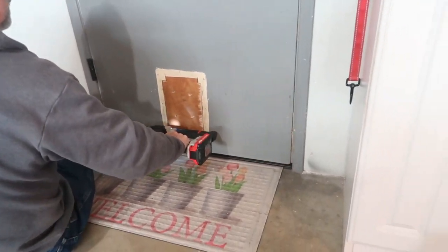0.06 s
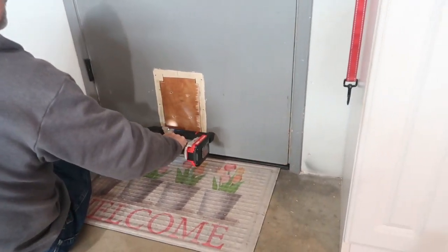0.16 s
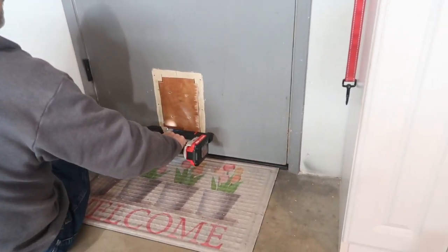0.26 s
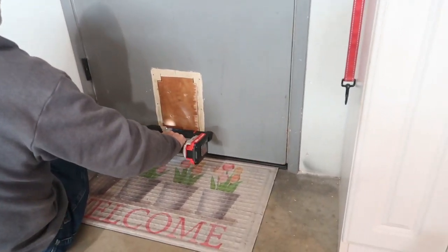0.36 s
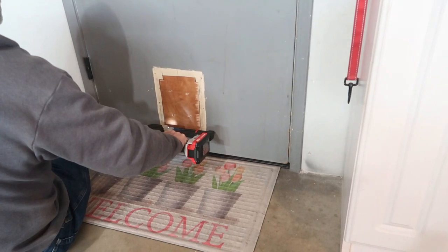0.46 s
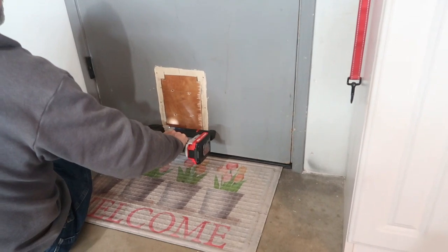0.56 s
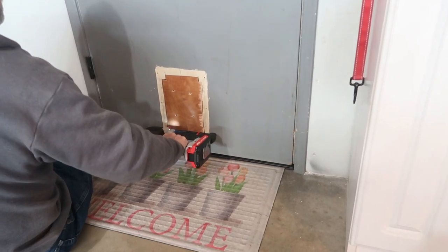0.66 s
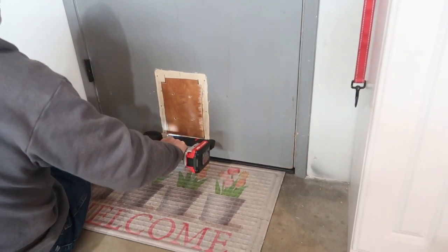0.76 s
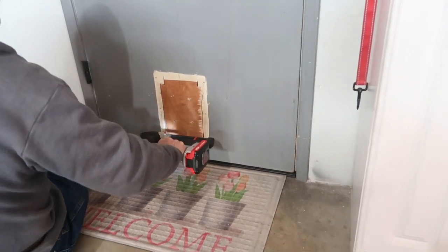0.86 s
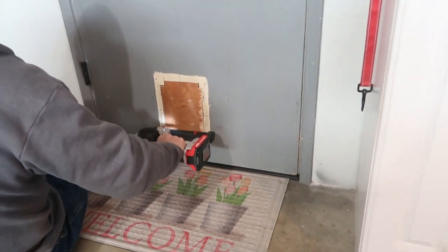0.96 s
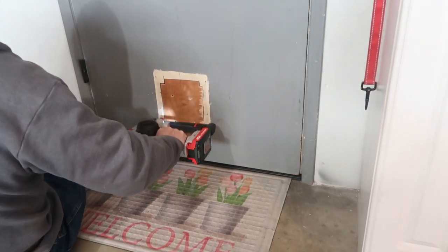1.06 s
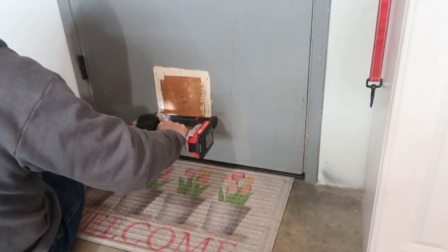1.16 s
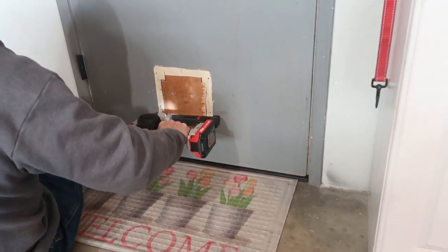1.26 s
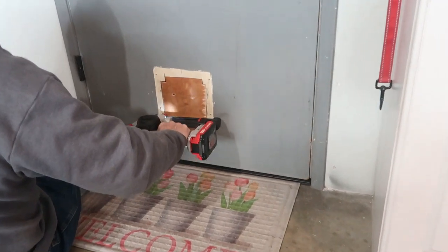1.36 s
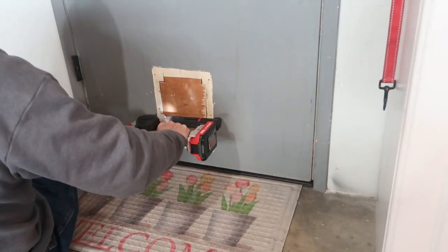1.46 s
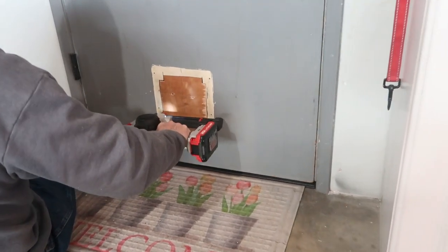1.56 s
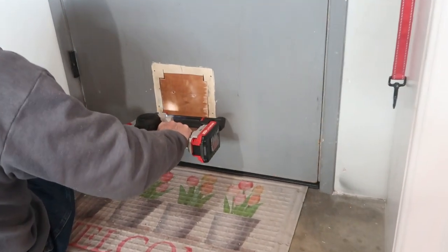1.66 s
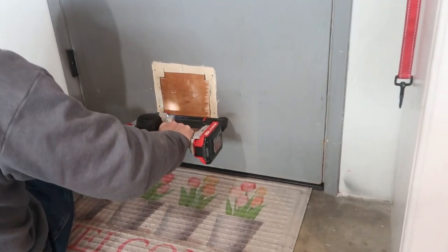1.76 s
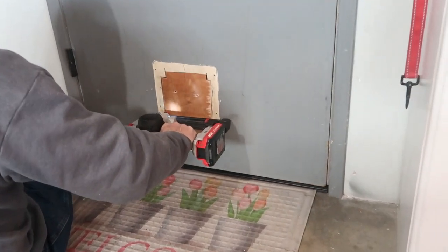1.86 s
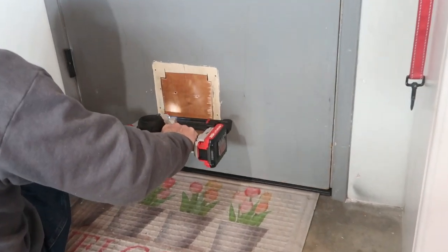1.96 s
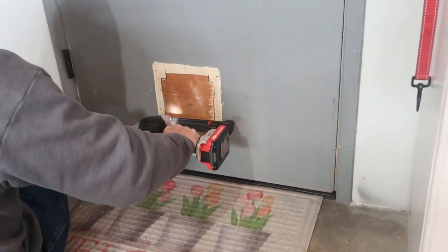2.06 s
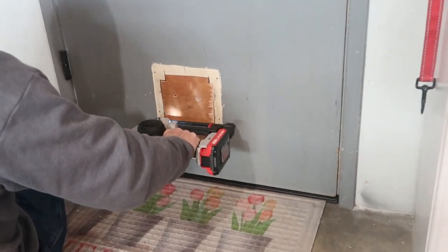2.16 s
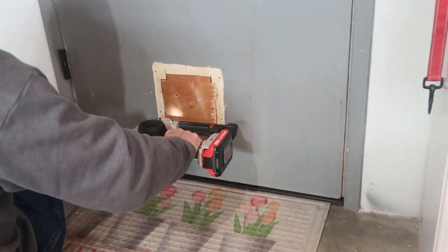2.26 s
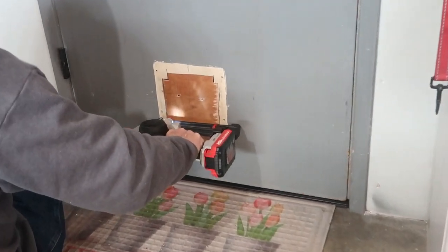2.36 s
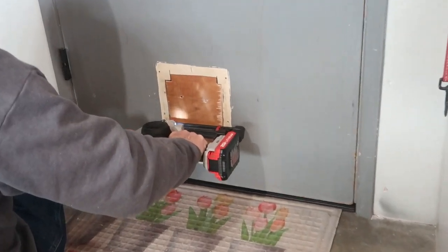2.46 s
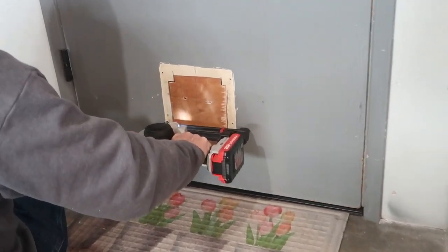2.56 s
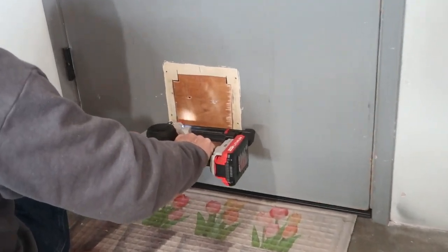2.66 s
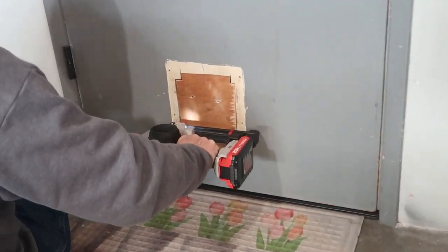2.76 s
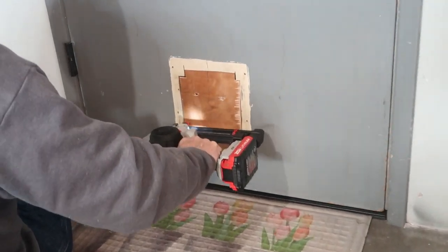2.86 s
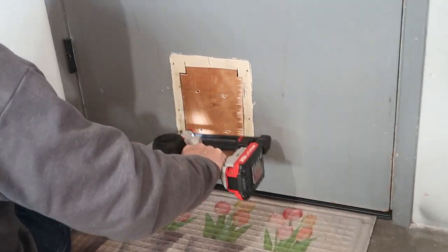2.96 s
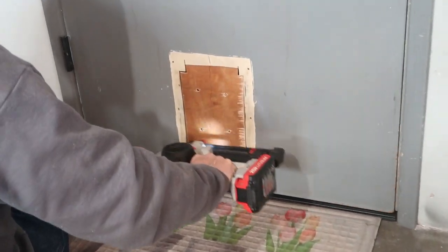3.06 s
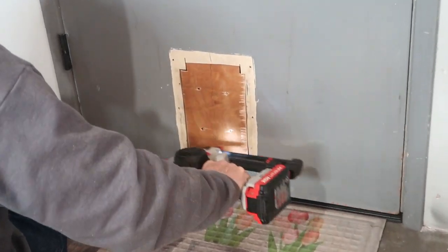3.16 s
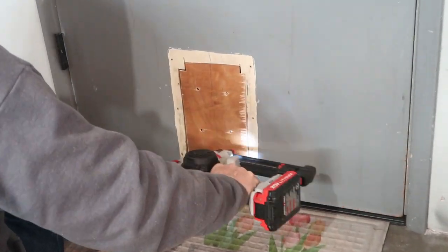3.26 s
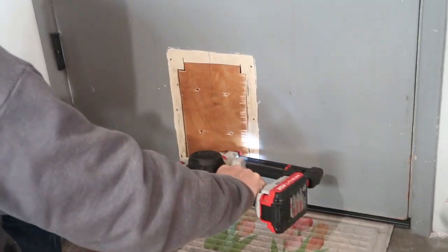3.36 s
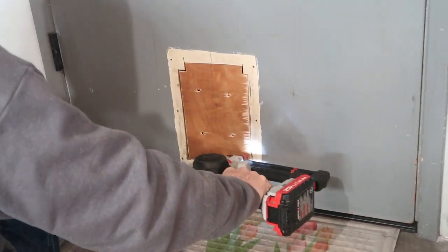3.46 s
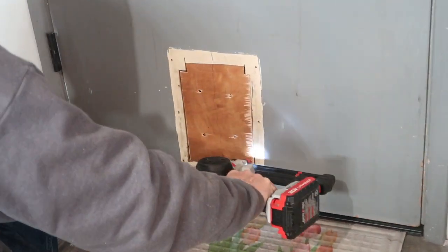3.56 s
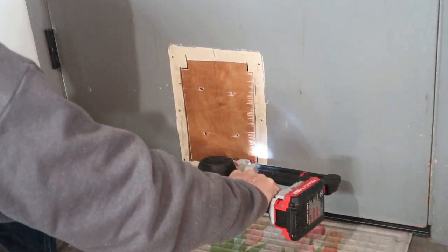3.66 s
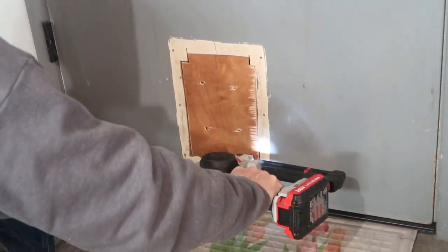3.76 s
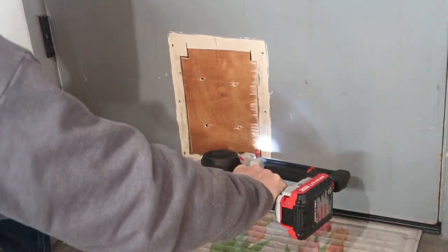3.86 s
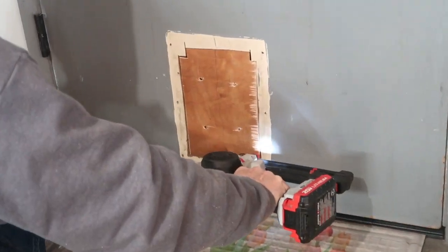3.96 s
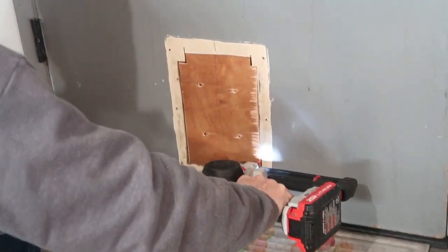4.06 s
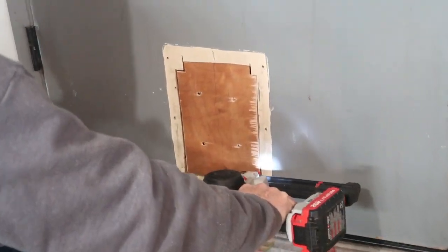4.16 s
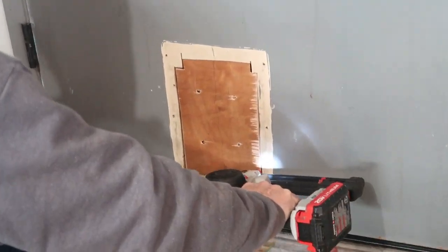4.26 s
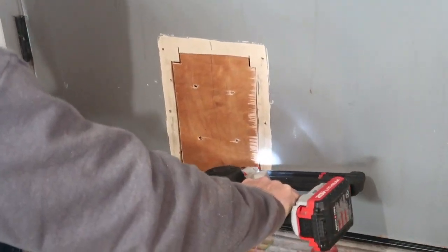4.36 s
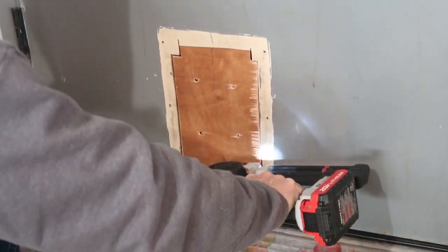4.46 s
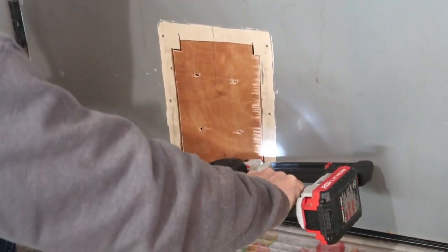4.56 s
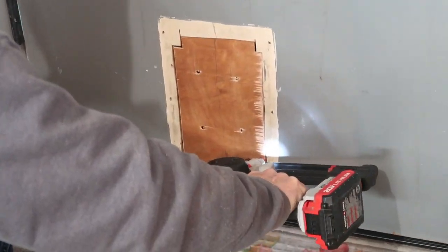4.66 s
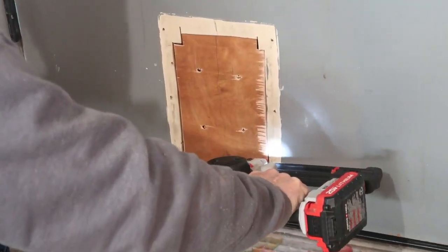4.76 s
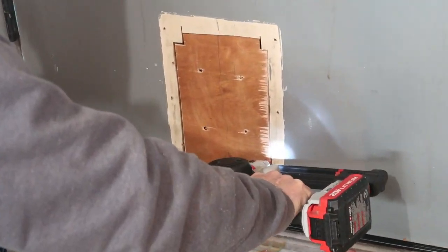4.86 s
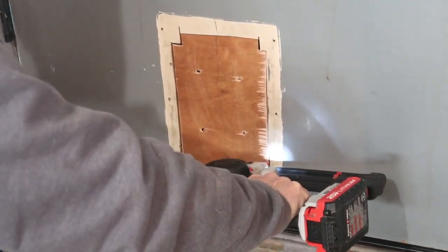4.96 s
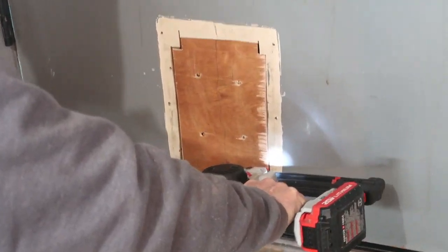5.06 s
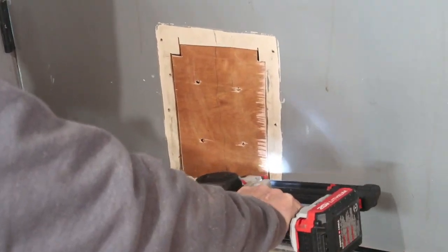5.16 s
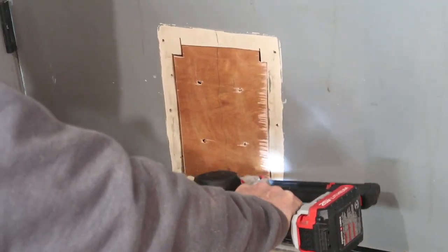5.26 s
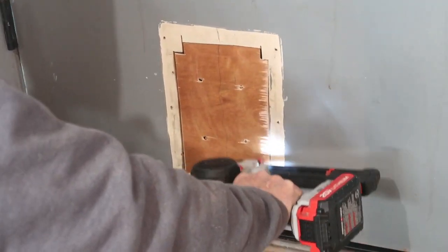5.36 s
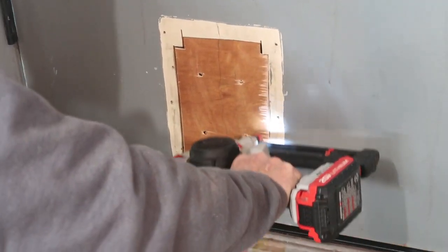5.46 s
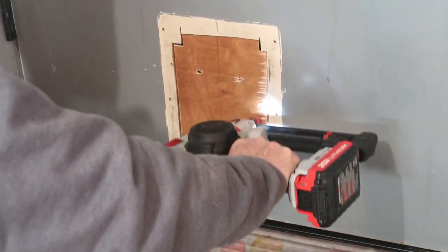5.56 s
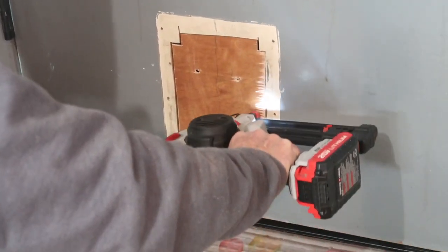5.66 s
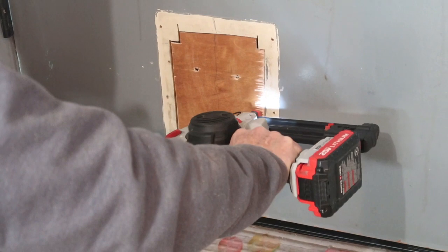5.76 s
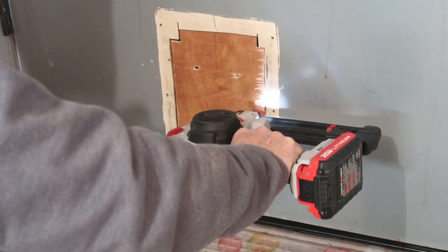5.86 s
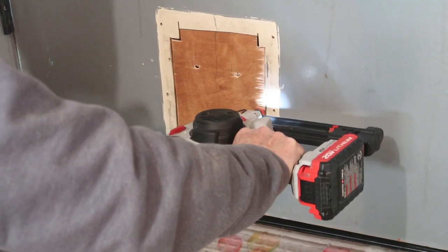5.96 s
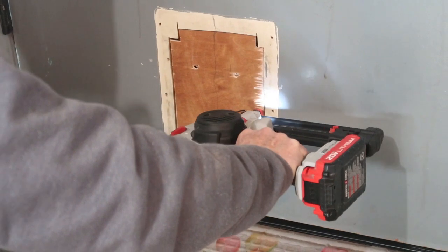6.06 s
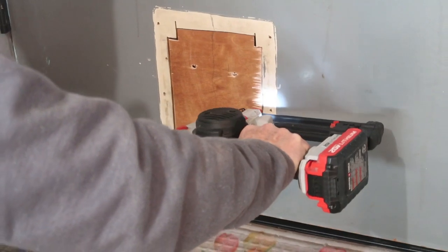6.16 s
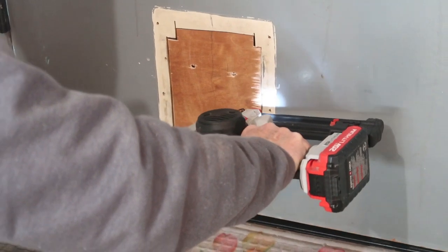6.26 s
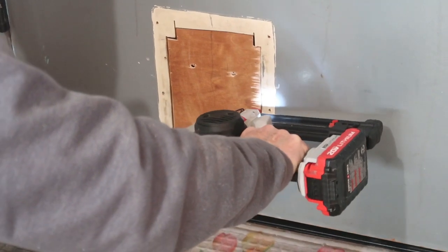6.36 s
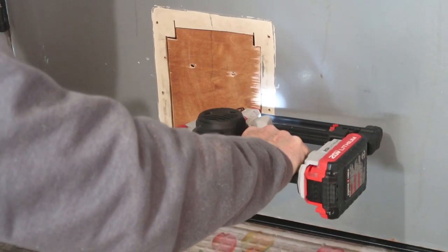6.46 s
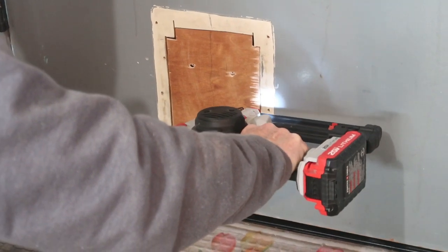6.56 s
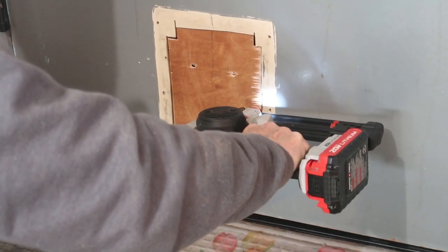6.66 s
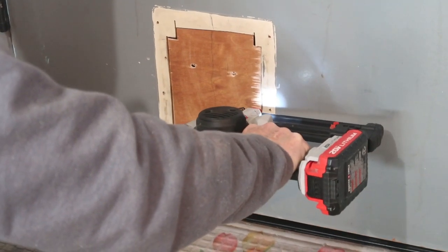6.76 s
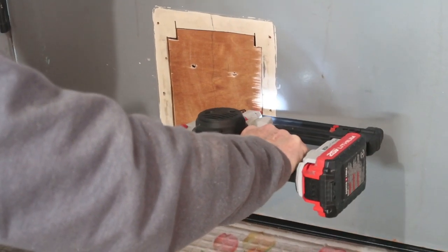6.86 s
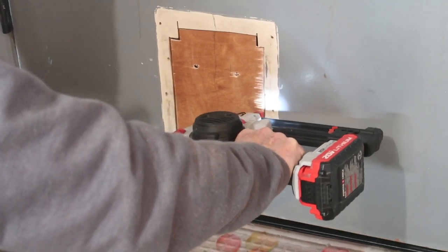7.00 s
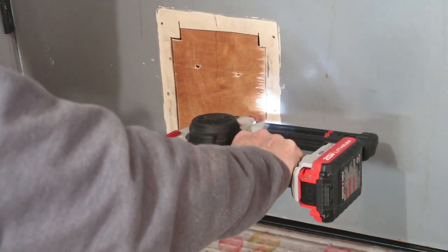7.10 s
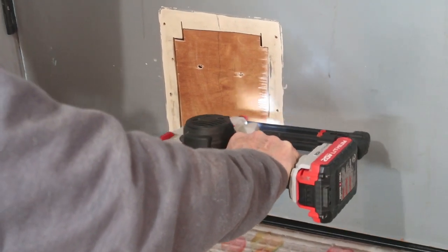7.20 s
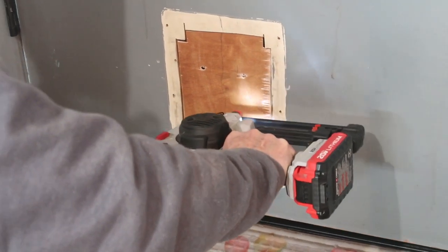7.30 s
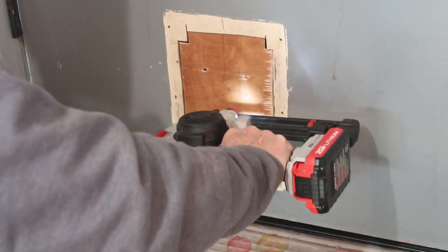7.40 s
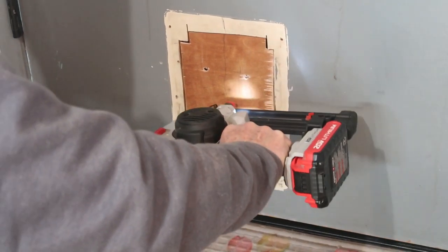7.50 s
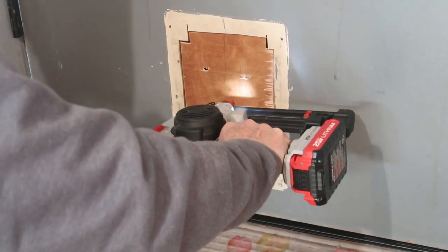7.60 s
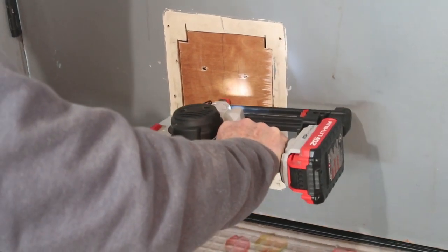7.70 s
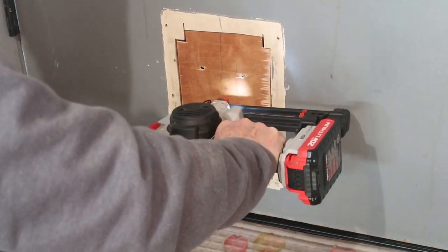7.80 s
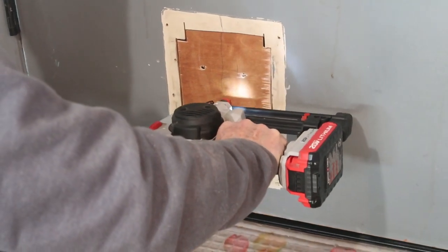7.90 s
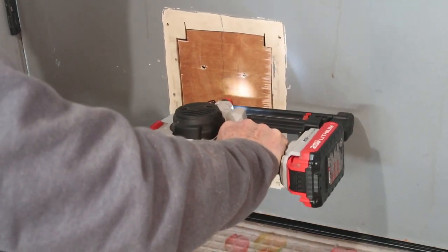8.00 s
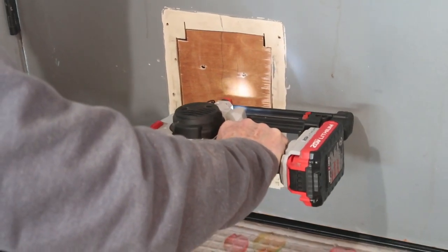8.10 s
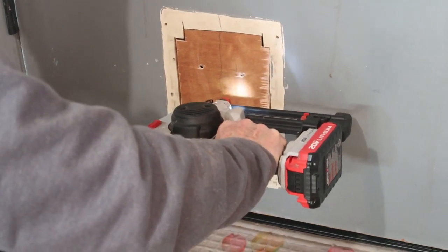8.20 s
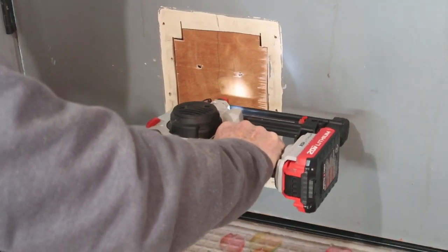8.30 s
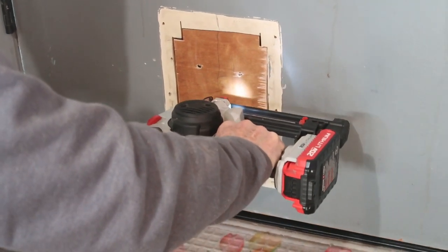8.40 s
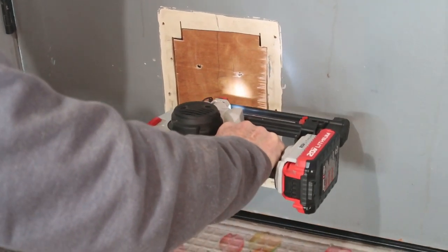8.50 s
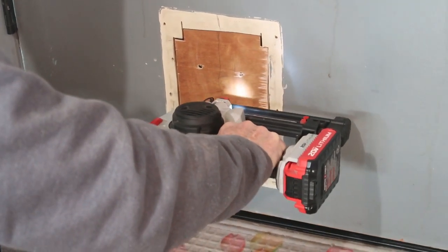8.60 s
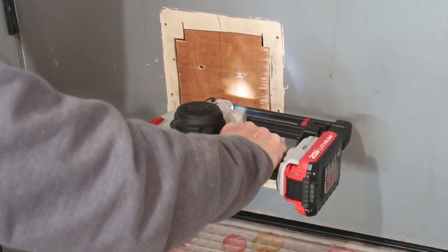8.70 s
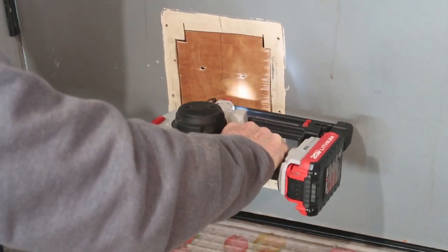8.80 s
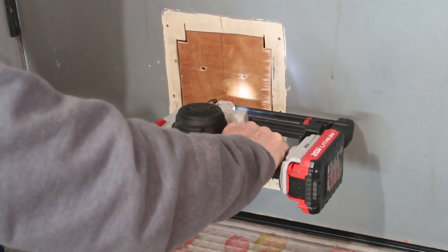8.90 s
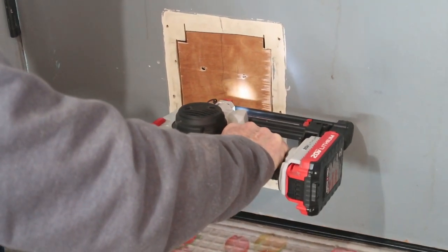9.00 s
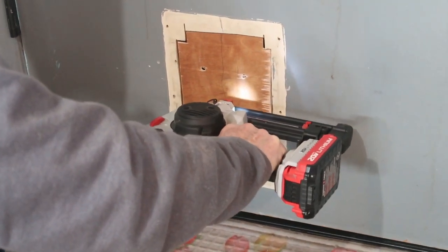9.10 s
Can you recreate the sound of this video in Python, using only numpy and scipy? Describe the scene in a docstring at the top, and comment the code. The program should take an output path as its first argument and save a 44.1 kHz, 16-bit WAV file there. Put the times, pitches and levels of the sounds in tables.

```python
"""Nail gun on a garage door

A battery nail gun is pressed on a plywood patch in a garage door and fires five nails; it knocks on the wood as
it is moved. Each time the trigger clicks, a flywheel of hiss and pole whine spins up and grips the driver with a
stick-slip shriek; the nail lands in noise bursts and ringing panel modes, and the coasting wheel's whir dies away.
Rumble and rustle lie beneath. Gain control dives after loud sounds and creeps back up; the microphone overloads."""
import sys
import numpy as np
from scipy import signal
from scipy.fft import rfft, irfft
from scipy.io import wavfile
from scipy.ndimage import uniform_filter1d

SR = 44100
rng = np.random.default_rng(int(sys.argv[2]) if len(sys.argv) > 2 else 0)


def store_wav(level_fs):
    """Save 16-bit WAV to argv[1]."""
    pcm = np.round(np.clip(np.atleast_2d(level_fs), -1, 1) * 32767)
    wavfile.write(sys.argv[1], SR, pcm.T.astype(np.int16))


N = 403074  # samples


def gain_of(db):
    """Turns decibels into gain."""
    return 10 ** (np.asarray(db) / 20)


def evened(x):
    """Scales a sound to rms 1."""
    return x / np.sqrt(np.mean(x ** 2) + 1e-20)


def noise(length):
    """White noise of rms about 1."""
    return rng.standard_normal(length)


def read(points, hz):
    """Reads a curve as straight lines on a log-frequency axis."""
    f, value = np.transpose(points)
    return np.interp(np.log(hz + 1), np.log(f + 1), value)


def add(mix, s, sound):
    """Mixes a sound in at s seconds."""
    part = mix[max(round(s * SR), 0):][:len(sound)]
    part += sound[:len(part)]


def coloured(x, spectrum, rings=()):
    """Filters by a spectrum with bell-shaped resonant lifts."""
    hz = np.fft.rfftfreq(len(x), 1 / SR)
    db = read(spectrum, hz)
    for f, width, lift_db in rings:
        db = db + lift_db / (1 + (2 * (hz - f) / width) ** 2)
    return irfft(rfft(x) * gain_of(db), len(x))


def patchy(x, patchy_db):
    """Lets narrow bands come and go at random."""
    z = signal.stft(x, nperseg=512)[2]
    field = uniform_filter1d(noise(z.shape), size=3, axis=0)  # across frequency
    field = uniform_filter1d(field, size=6, axis=1)  # across time
    return signal.istft(z * gain_of(patchy_db * evened(field)), nperseg=512)[1][:len(x)]


def resonate(x, hz, width):
    """Shifts hz down to zero, smooths, and shifts back: a resonance of gain 1."""
    turn = np.exp(2j * np.pi * np.cumsum(hz * np.ones(len(x))) / SR)
    r = np.exp(-np.pi * width / SR)
    return 2 * (turn * signal.lfilter([1 - r], [1, -r], x / turn)).real


def wander(length, width):
    """Slow random drift of rms 1."""
    return evened(resonate(noise(length), 0, width))


# Unsteady low drone of the street and shifting hands: (frequency [Hz], relative density [dB per Hz])
RUMBLE_SPECTRUM = [(12, -31.5), (20, -3), (48, 6), (102, -1.5), (201, -2), (236, -3.5), (387, -4),
                   (515, -14), (720, -17.5), (900, -11), (1170, -48), (1980, -120)]
# Rubbing of clothes: (frequency [Hz], relative density [dB per Hz])
RUSTLE_SPECTRUM = [(240, -29), (400, -7), (518, -17), (723, -12), (1250, -18.5), (1470, -16.5),
                   (2060, -23.5), (2790, -22), (4260, -32.5), (9370, -41), (15000, -66)]
# Hands and clothes shifting about: (time [s], rumble level [dB], rustle level [dB])
SHUFFLE_LEVELS = [(0, -43.5, -40.5), (.3, -47.5, -56.5), (1.0, -48.5, -51), (1.4, -48, -56),
                  (2.0, -40.5, -50.5), (2.2, -42, -50.5), (3.0, -49.5, -47.5), (3.3, -46.5, -49.5),
                  (3.8, -42, -52), (4.2, -40.5, -47), (4.6, -43.5, -51.5), (5.5, -47.5, -51.5),
                  (6.0, -41, -51.5), (6.4, -43.5, -49.5), (7.4, -48, -47.5), (7.6, -42.5, -52),
                  (8.0, -43.5, -48.5), (8.25, -44.5, -53), (8.5, -39.5, -49.5)]
# Hiss of the microphone itself: (frequency [Hz], filter gain on white noise [dB])
SELF_NOISE_SPECTRUM = [(1000, -91), (6000, -81), (12000, -82), (15000, -94.5)]
# One faint steady tone: (frequency [Hz], width [Hz], level [dB])
FAINT_TONE = (2840, 30, -71)
# Stereo spread of the background: (frequency [Hz], side minus mid [dB])
BACKGROUND_SPREAD = [(60, -26), (110, -17.5), (200, -12), (380, -9.5), (700, -10.5), (1290, -6.5),
                     (2380, -4.5), (4400, -0.5), (8120, 4), (15000, 5)]


def background():
    """Lumpy low rumble, patchy rustle, microphone hiss and a faint tone, as independent mid and side."""
    s, rumble_db, rustle_db = np.transpose(SHUFFLE_LEVELS)
    t = np.arange(N) / SR
    # mid and side share these swells
    rumble_gain = gain_of(np.interp(t, s, rumble_db) + 1.2 * wander(N, 15))
    rustle_gain = gain_of(np.interp(t, s, rustle_db) + 1.7 * wander(N, 15))
    tone_hz, tone_width, tone_db = FAINT_TONE
    pair = []
    for k in range(2):
        rumble = rumble_gain * evened(coloured(noise(N), RUMBLE_SPECTRUM))
        rustle = rustle_gain * evened(patchy(coloured(noise(N), RUSTLE_SPECTRUM), patchy_db=2.5))
        hiss = coloured(noise(N), SELF_NOISE_SPECTRUM)
        tone = gain_of(tone_db) * evened(resonate(noise(N), tone_hz, tone_width))
        pair.append(rumble + rustle + hiss + tone)
    return pair[0], coloured(pair[1], BACKGROUND_SPREAD)


# Decay of the garage's echo: (frequency [Hz], t60 [s])
GARAGE_DECAY = [(60, 0.38), (250, 0.12), (1000, 0.3), (3000, .27), (6000, 0.23), (12000, 0.081)]
GARAGE_DB = -9.5


def garage(x):
    """Reverberates through sparse taps of random sign, each band dying at its own speed."""
    taps = np.zeros(SR // 2)
    at = np.arange(200, len(taps) - 20, 20)
    taps[at + rng.integers(0, 20, len(at))] = rng.choice([-1., 1.], len(at))
    hz, t, z = signal.stft(taps, SR, nperseg=256)
    decay = gain_of(-60 * t / read(GARAGE_DECAY, hz)[:, None])
    tail = signal.istft(z * decay, SR, nperseg=256)[1]
    return gain_of(GARAGE_DB) * signal.fftconvolve(x, tail / np.linalg.norm(tail))[:N]


JOLT, JOLT_S = 2.2, .008  # extra strength of the first swings, and its time constant [s]


def rung(modes, contact_s):
    """A half-sine push sets modes ringing, rms 1 over the first 30 ms; a short contact wakes the higher ones."""
    t = np.arange(SR // 2) / SR
    hz, db, t60 = np.transpose(modes)[:, :, None]
    hz = hz * (1 + 0.033 * noise(hz.shape))  # the hand on the wood shifts them a little
    side = (-1.) ** np.arange(len(hz))[:, None]  # neighbouring modes start in opposite directions
    ring = (side * gain_of(db - 60 * t / t60) * np.sin(2 * np.pi * hz * t)).sum(0)
    push = np.sin(np.pi * np.clip(t[:400] / max(contact_s, .0002), 0, 1))
    out = signal.fftconvolve(ring, push)[:len(t)] * (1 + JOLT * np.exp(-t / JOLT_S))
    return out / np.sqrt(np.mean(out[:3 * SR // 100] ** 2))


# Modes of the plywood: (nominal frequency [Hz], relative level [dB], t60 [s])
PANEL_MODES = [(190, -7, 0.072), (279, 3, 0.049), (380, 1, 0.059), (462.5, -11.5, 0.18), (599, -4, 0.066),
               (679, -3, 0.18), (788, -2.5, 0.19), (887, -2.5, 0.16), (1024, -5, 0.12)]
# Modes of the door, far deeper: (nominal frequency [Hz], relative level [dB], t60 [s])
DOOR_MODES = [(32.3, -12.5, 0.09), (57.4, -5, 0.21), (98.6, -2, .22), (127.4, -0.5, 0.26),
              (157, -4.5, 0.15)]


def panel_and_door(panel_db, panel_contact_s, door_db, door_contact_s):
    """Plywood and door boom together, each woken by its own push."""
    panel = gain_of(panel_db) * rung(PANEL_MODES, panel_contact_s)
    return panel + gain_of(door_db) * rung(DOOR_MODES, door_contact_s)


# Resonances of the tool's housing: (frequency [Hz], width [Hz], lift [dB])
HOUSING_RINGS = [(990, 130, 3.5), (1370, 410, 3), (1810, 78, 8), (2600, 110, 4), (3980, 160, 1),
                 (4750, 90, 8.5), (7160, 100, 7.5), (12500, 72, 4.5)]


def housed(x, spectrum):
    """Colours a sound by its spectrum and the resonances of the housing."""
    return coloured(x, spectrum, HOUSING_RINGS)


def burst(decay_s, rise_s, spectrum):
    """Noise in the housing that starts quickly and dies away."""
    t = np.arange(8192) / SR
    grain = evened(housed(noise(len(t)), spectrum))
    return grain * (1 - np.exp(-t / rise_s)) * np.exp(-t / max(decay_s, .0005))


# Clicking of hard tool parts: (frequency [Hz], relative density [dB per Hz])
CLATTER_SPECTRUM = [(290, -20), (500, -1.5), (875, 1), (2040, -4.5), (3420, -7.5), (5040, -9.5),
                    (5990, -10), (8330, -21), (11300, -22), (15400, -33)]


def clatter(decay_s, rise_s):
    """A short burst of hard, dry clicking."""
    return burst(decay_s, rise_s, CLATTER_SPECTRUM)


# Knocks of the nose on the wood: (time [s], click peak level [dB], click frequency [Hz],
# share of wide rattle [ratio], rattle decay [s], panel level [dB], door level [dB])
NOSE_KNOCKS = [(0.0137, -15, 3540, 0.38, 0.014, -33, -23.5), (1.2177, -33.5, 4700, 0.62, 0.0022, -56, -52),
               (1.35, -34.5, 1200, .5, 0.0051, -41.5, -57), (1.379, -43, 1500, .5, 0.0065, -43.5, -55),
               (1.5244, -28, 3740, 0.82, 0.015, -27.5, -32.5), (1.5429, -25.5, 2920, 1, .014, -29, -33.5),
               (1.6107, -28, 2630, .45, .018, -39, -39), (1.6396, -26, 3770, 0.28, 0.011, -40.5, -45),
               (2.025, -31, 3760, 0.51, 0.033, -40, -36), (2.055, -14, 3500, 0.23, 0.011, -29.5, -26),
               (2.8596, -22, 2610, 0.21, 0.013, -34.5, -37.5), (3.66, -29, 2980, 0.96, 0.019, -42.5, -41.5),
               (3.7214, -32.5, 2940, 0.53, 0.021, -53, -47.5), (3.9735, -27.5, 4180, 1, 0.018, -47, -42),
               (4.153, -38.5, 2340, 0.55, .025, -49, -45), (4.2273, -31, 3730, .3, .015, -51, -44),
               (4.2728, -27, 4000, 0.4, 0.009, -51, -50), (5.9615, -35, 1500, 0.93, .012, -37, -52.5),
               (5.9791, -28, 4800, 0.98, 0.018, -45, -52), (6.005, -27.5, 2610, 0.62, 0.017, -42, -56),
               (6.2004, -32, 4000, 0.57, 0.024, -43, -35), (6.2331, -17.5, 3440, 0.38, .016, -37.5, -28),
               (6.347, -38.5, 2620, 0.23, .013, -44, -44.5), (7.0684, -20, 2800, 0.23, 0.015, -40, -46),
               (7.8009, -28.5, 2830, .65, 0.046, -23, -40), (7.8389, -15, 3850, 1, .022, -29.5, -45),
               (7.9965, -52, 2740, .45, 0.013, -42.5, -46), (8.317, -52.5, 2443, 0.41, .015, -41, -58.5),
               (8.3548, -36.5, 1000, .4, 0.052, -35.5, -35), (8.412, -27.5, 4140, 0.84, 0.014, -37, -27),
               (8.4362, -10.5, 3230, 0.65, 0.014, -25.5, -28), (8.445, -24, 1700, 0.67, .017, -34.5, -22)]
SHARP, KNOCK_CONTACT_S = 1.61, 0.0013  # weight of the sharp snap, push on the wood [s]


def knocks(mix):
    """The nose of the tool clicks and rattles on the wood; panel and door answer."""
    for s, click_db, hz, wide, rattle_s, panel_db, door_db in NOSE_KNOCKS:
        snap = clatter(rattle_s, 0.0022) + SHARP * clatter(0.0026, 0.00073)
        click = resonate(resonate(snap, hz, 1400), hz, 1400) + wide * snap
        add(mix, s, gain_of(click_db) * click / abs(click).max())
        add(mix, s, panel_and_door(panel_db, KNOCK_CONTACT_S, door_db, 0.0069))


TRIGGER_DB, TRIGGER_HZ = -33, 4530


def trigger():
    """A tick of clatter through two resonances an octave apart."""
    tick = clatter(.01, 0.00055)
    click = resonate(tick, TRIGGER_HZ, 870) + 1.8 * resonate(tick, 2 * TRIGGER_HZ, 1200)
    return gain_of(TRIGGER_DB) * click


# Motor poles: (multiple of the wheel speed [ratio], relative whine level [dB])
POLE_WHINES = [(7, -20), (14, -9.5), (28, -9), (42, -20), (56, -23), (70, -23)]


def pole_whine(speed, turns, twice_db):
    """Motor poles whine on multiples of the speed, part steady tone, part narrow noise."""
    length = len(speed)
    whine = np.zeros(length)
    for k, db in [(2, twice_db)] + POLE_WHINES:
        fuzz = evened(resonate(noise(length), k * speed, k))
        chatter = gain_of(2.5 * wander(length, 25))  # it breaks up as the brushes chatter
        whine += gain_of(db) * chatter * (np.sin(2 * np.pi * k * turns) + .8 * fuzz)
    whine = housed(whine, [(20, 0), (20000, 0)])
    return whine * 1.25 * np.minimum(speed / 90, 1) ** 1.5  # emerges with speed


# Hiss of the bearings: (frequency [Hz], relative density [dB per Hz])
BEARING_SPECTRUM = [(120, -36.5), (200, -9), (268, -6), (596, -5.5), (956, -2.5), (1260, -8), (1770, -7.5),
                    (2170, -8), (3410, -7), (6000, -17), (8950, -12), (12900, -17), (15400, -33.5)]
RUSH_HZ, RUSH_POWER = 2560, 0.49  # hiss above this [Hz] grows with this extra power of the speed


def bearing_hiss(speed, turns):
    """Patchy noise that brightens with speed and pulses a little once a turn."""
    hiss = evened(patchy(housed(noise(len(speed)), BEARING_SPECTRUM), patchy_db=3.0))
    low = signal.sosfiltfilt(signal.butter(2, RUSH_HZ, fs=SR, output="sos"), hiss)
    hiss = low + (hiss - low) * (speed / speed[-1]) ** RUSH_POWER * 1.2
    hiss = hiss * (1 + 0.31 * np.cos(2 * np.pi * turns))
    return hiss * gain_of(0.71 * wander(len(speed), 120))  # uneven grain


# How the door answers the wheel: (wheel speed [Hz], response [dB])
DOOR_RESPONSE = [(30, -20), (55, -13), (81, -8), (93, -13), (113, -2), (130, 0), (147, -2)]


def door_shake(speed, turns):
    """The wheel shakes the door once a turn, strongest where the door answers."""
    shake = np.sqrt(2) * np.sin(2 * np.pi * turns) * np.clip(speed / 60., 0, 1) ** 2
    shake = shake * gain_of(1.5 * wander(len(speed), 30))  # the grip on the tool wavers
    return gain_of(read(DOOR_RESPONSE, speed)) * shake


# Spin-ups, one for each shot: (trigger time [s], speed the wheel nears [Hz], hiss level at FULL_HZ [dB],
# shake level before the door's response [dB], relative whine level on twice the speed [dB])
SPIN_UPS = [(0.2239, 229, -36.5, -32, -18.5), (2.285, 222.6, -34, -30, -5),
            (4.6396, 230.6, -34.5, -27.5, -20), (6.4476, 224.2, -34.5, -31, -20),
            (8.709, 226, -32, -28.5, -35)]
SPIN_S = .36  # time constant of the spin-up
FULL_HZ, HISS_POWER = 141, 0.74  # reference speed; hiss and whine grow with this power of the speed
CLOSING_S, CLOSING_DB = .013, 8.5  # hiss and whine jump this long before the grip, as the wheel closes in


def flywheel(mix):
    """The trigger clicks and the wheel nears its top speed exponentially, hissing, whining and shaking."""
    for (start, top_hz, full_db, shake_db, twice_db), shot in zip(SPIN_UPS, NAIL_SHOTS):
        add(mix, start, trigger())
        t = np.arange(start, shot[0] + 0.0037, 1 / SR)
        speed = top_hz * (1 - np.exp(-(t - start) / SPIN_S))
        turns = np.cumsum(speed) / SR
        closing_db = CLOSING_DB * np.clip((t - shot[0] + CLOSING_S) / 0.0018, 0, 1)
        level = gain_of(full_db + closing_db) * (speed / FULL_HZ) ** HISS_POWER
        sound = level * (bearing_hiss(speed, turns) + pole_whine(speed, turns, twice_db))
        sound += gain_of(shake_db) * door_shake(speed, turns)
        add(mix, start, sound * signal.windows.tukey(len(t), .03))


# Whir of the coasting wheel: (frequency [Hz], relative density [dB per Hz])
COAST_SPECTRUM = [(290, -45.5), (500, -14), (929, -2.5), (4760, -9.5), (5720, -18.5), (6310, -9),
                  (8370, -23), (12600, -17.5), (14500, -60)]
# Its resonances: (frequency [Hz], width [Hz], lift [dB])
COAST_RESONANCES = [(937, 210, 5), (1570, 52, 6.5), (1730, 40, 6.5), (2300, 110, 7.5), (2900, 40, 6),
                    (4750, 64, 10), (6300, 60, 10), (7300, 50, 12), (12300, 60, 13.5)]
# Its dying away: (time after the grip [s], level over COAST_DB [dB])
COAST_FADE = [(.02, 0), (.2, 0), (.3, -2.5), (.42, -4.5), (.47, -17.5), (.55, -19), (.7, -50)]
# One part sings on: (frequency [Hz], width [Hz], [(time after the grip [s], level over COAST_DB [dB])])
SINGING_PART = (4720, 34, [(.2, -20.5), (.45, -19), (.58, -26), (.62, -35)])
COAST_DB = -40.5


def coasting():
    """Patchy resonant noise dies away while one narrow band sings on."""
    t = np.arange(round(COAST_FADE[-1][0] * SR)) / SR
    whir = evened(patchy(coloured(noise(len(t)), COAST_SPECTRUM, COAST_RESONANCES), patchy_db=4.0))
    ring_hz, width, ring_fade = SINGING_PART
    ring = evened(resonate(noise(len(t)), ring_hz, width))
    whir = whir * gain_of(np.interp(t, *np.transpose(COAST_FADE)))
    ring = ring * gain_of(np.interp(t, *np.transpose(ring_fade)))
    return gain_of(COAST_DB) * (whir + ring)


# Crack of the blow and grit of the shriek: (frequency [Hz], relative density [dB per Hz])
CRACK_SPECTRUM = [(180, -26), (300, -6), (534, -6), (1050, -5), (1810, -10.5), (2520, -7.5), (3800, -10),
                  (4560, -11), (5650, -15.5), (7110, -20), (7850, -22), (12100, -22), (15400, -39.5)]
BLOW_S = .0052  # from grip to blow


def shriek(hz):
    """Stick-slip: strong and weak slips in turn, uneven, quickening as the driver gathers speed."""
    t = np.arange(round(.025 * SR)) / SR  # the grip comes at 4 ms
    # a light touch for 3 ms, then the full grip, fading after the blow
    swell_s = [-.003, -.002, -.0003, 0, BLOW_S, BLOW_S + 0.0081]
    swell = np.interp(t - .004, swell_s, [0.016, 0.44, 0.019, 0.95, 0.97, 0.022])
    uneven = 0.071 * evened(uniform_filter1d(noise(len(t)), 60))
    turns = np.cumsum(hz * (1 + 18. * (t - .007) + uneven)) / SR
    slips = np.sin(2 * np.pi * turns) + 0.36 * np.sin(np.pi * turns) + 0.33 * np.sin(3 * np.pi * turns)
    grit = evened(coloured(noise(len(t)), CRACK_SPECTRUM))
    return swell * (0.4 * slips + 0.33 * grit)


def crack():
    """The nail lands: a dense short burst over a sharper, longer one."""
    return burst(0.0056, 0.0014, CRACK_SPECTRUM) + .5 * burst(0.04, 0.00038, CRACK_SPECTRUM)


# Shots: (grip time [s], relative shriek level [dB], shriek frequency 3 ms after the grip [Hz],
# relative crack level [dB], panel level [dB], push of the nail [s], door level [dB])
NAIL_SHOTS = [(0.6099, 1, 2600, 1, -6, 0.00063, -15), (2.6790, 2.5, 2617, 1, -8.5, 0.0011, -13.5),
              (5.03, 3, 2514, 0, -3, .0013, -14), (6.8401, 3.5, 2448, 1.5, -7, 0.00076, -12),
              (9.1000, 7.5, 2586, -3, -3.5, 0.0011, -17)]


def shots(mix):
    """The wheel grips the driver with a shriek, the nail lands, panel and door boom, the wheel coasts."""
    for s, shriek_db, hz, crack_db, panel_db, contact_s, door_db in NAIL_SHOTS:
        add(mix, s - .004, gain_of(shriek_db) * shriek(hz))
        blow = s + BLOW_S
        add(mix, blow, gain_of(crack_db) * crack())
        add(mix, blow, panel_and_door(panel_db, contact_s, door_db, 0.00067))
        bottoming = burst(0.0028, 0.00064, CRACK_SPECTRUM)  # the driver bottoms out
        add(mix, blow + .004, gain_of(crack_db - 1.0) * bottoming)
        add(mix, s, coasting())


# Stereo spread of the tool: (frequency [Hz], side minus mid [dB])
TOOL_SPREAD = [(60, -28), (200, -27), (700, -24), (1290, -22), (2380, -16), (4400, -9), (8120, -3),
               (15000, -2)]


def scene():
    """Two close microphone ports agree in the bass and part in the treble."""
    tool = np.zeros(N)
    knocks(tool)
    flywheel(tool)
    shots(tool)
    mid, side = background()
    # nearby surfaces reach the ports unequally
    scatter = noise(2048) * np.exp(-np.arange(2048) / SR / .006)
    near = signal.oaconvolve(tool, scatter / np.linalg.norm(scatter))[:N]
    mid = mid + tool + garage(tool)
    side = side + coloured(near + garage(tool), TOOL_SPREAD)
    return np.array([mid + side, mid - side])


BASS_CUT_HZ, EDGE_HZ = 30, 15600  # lower and upper band limit
DUCK_FROM_DB, DUCK_MOST_DB, DUCK_AT_START_DB = -23.5, 14.5, 10.5  # threshold, deepest and first reduction
DUCK_S, RECOVER_DB_PER_S = 0.013, 10  # time constant of each smoothing stage, creep back up


def record(dry):
    """The deepest bass is lost; gain dives after loud sounds and creeps back; peaks clip; treble is cut."""
    heard = signal.sosfilt(signal.butter(1, BASS_CUT_HZ, "high", fs=SR, output="sos"), dry)
    power = abs(uniform_filter1d((heard ** 2).mean(0), size=400, origin=199))  # over the last 9 ms
    power_db = 10 * np.log10(power + 1e-12)
    # a running peak on a rising slope, less the slope, falls back steadily
    back_db = RECOVER_DB_PER_S * np.arange(N) / SR
    over_db = np.maximum(np.minimum(power_db, 0) - DUCK_FROM_DB + back_db, DUCK_AT_START_DB)
    duck_db = np.clip(np.maximum.accumulate(over_db) - back_db, 0, DUCK_MOST_DB)
    # two smoothing stages, settled at the first reduction
    r = np.exp(-1 / (DUCK_S * SR))
    duck_db = signal.lfilter([(1 - r) ** 2], [1, -2 * r, r ** 2], duck_db - DUCK_AT_START_DB)
    duck_db = duck_db + DUCK_AT_START_DB
    clipped = np.clip(heard / gain_of(duck_db), -.97, .97)
    treble_cut = signal.firwin(255, EDGE_HZ, window=("kaiser", 7), fs=SR)
    return signal.oaconvolve(clipped, treble_cut[None], "same")


dry = scene()
out = record(dry)
store_wav(out)
```